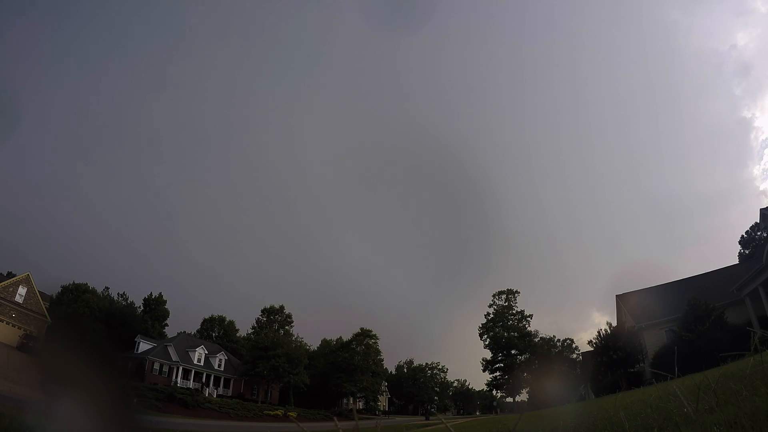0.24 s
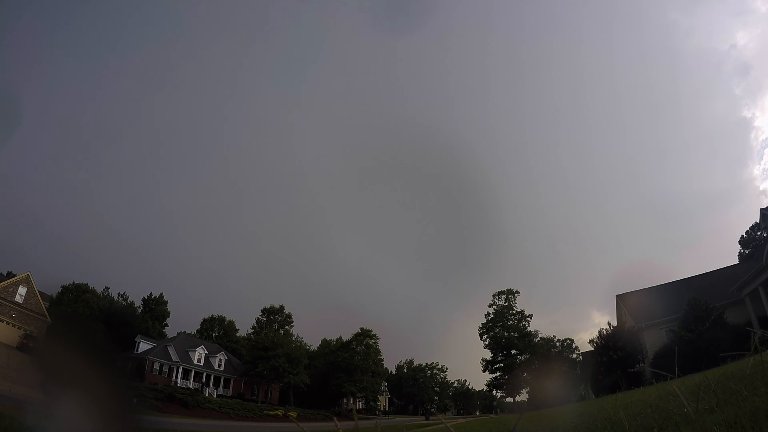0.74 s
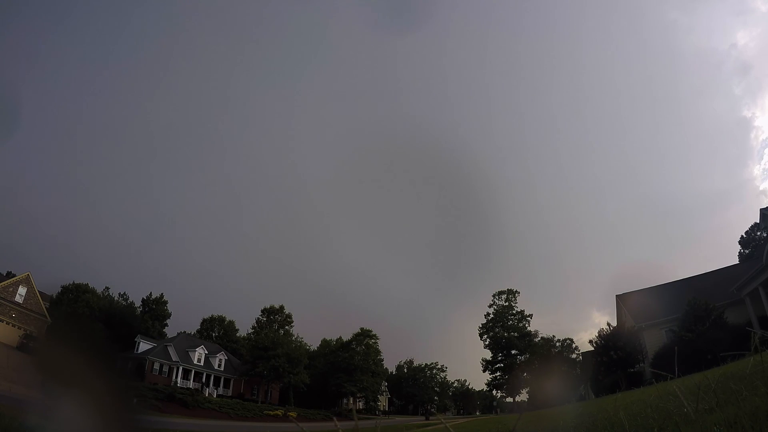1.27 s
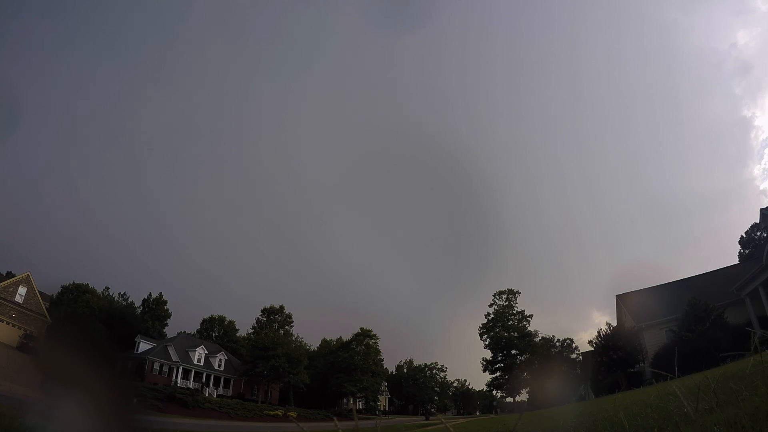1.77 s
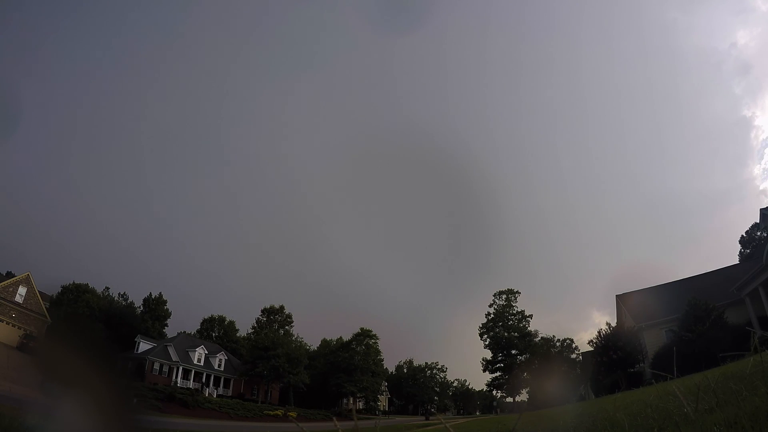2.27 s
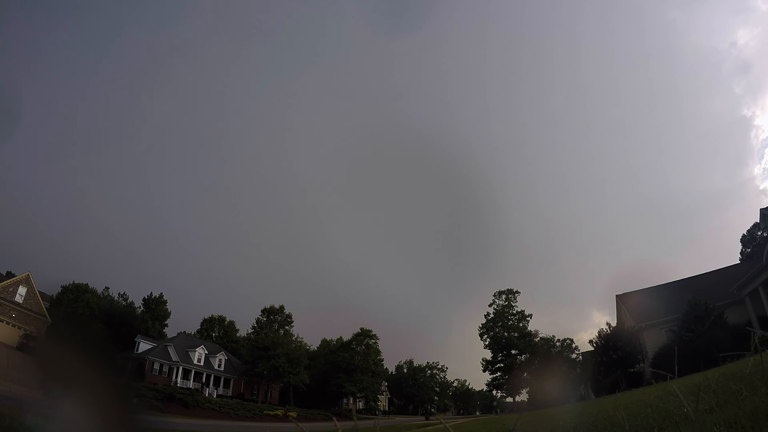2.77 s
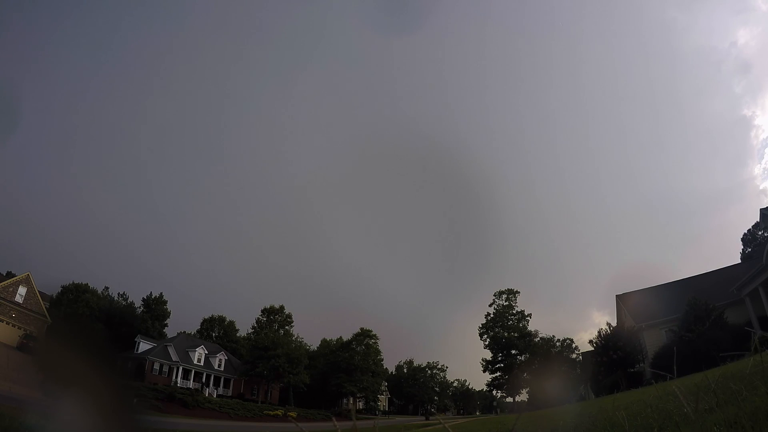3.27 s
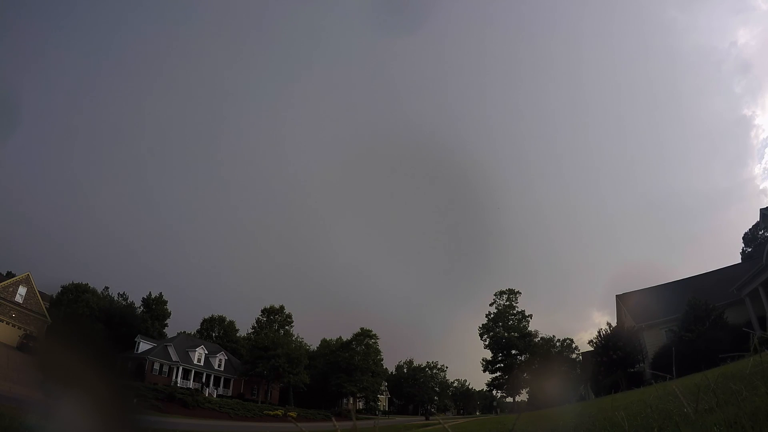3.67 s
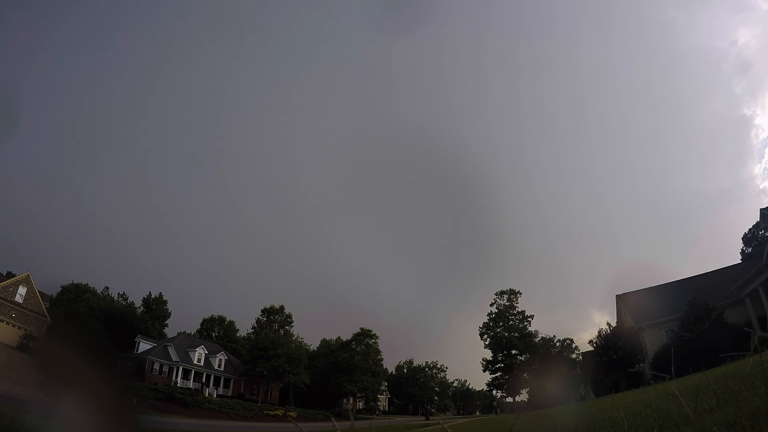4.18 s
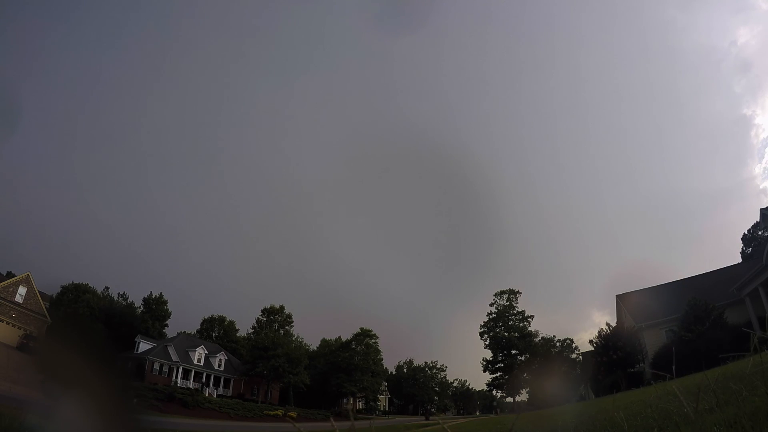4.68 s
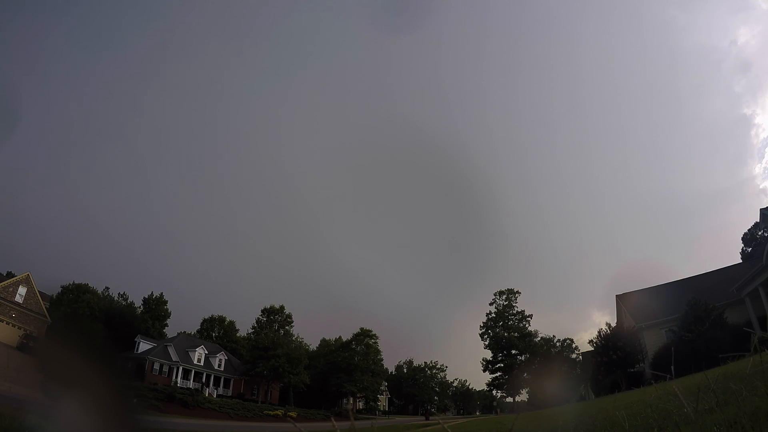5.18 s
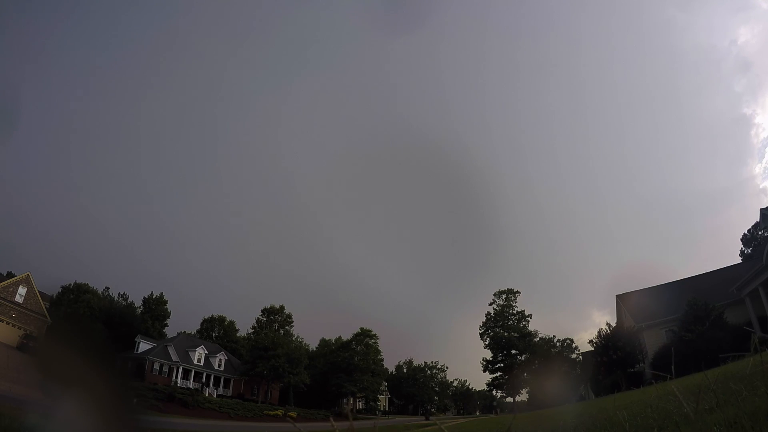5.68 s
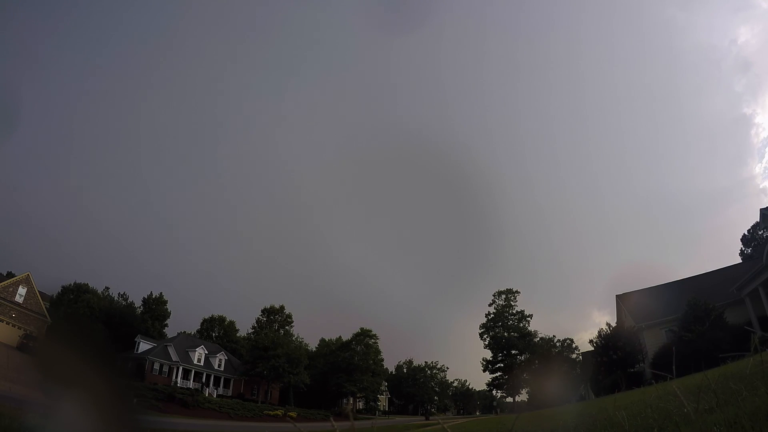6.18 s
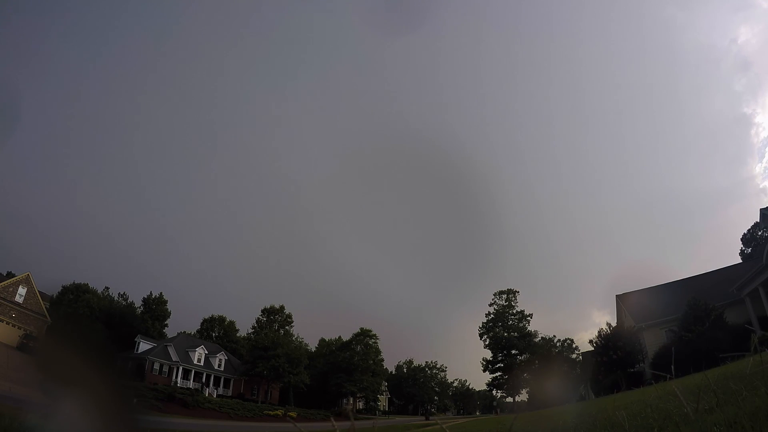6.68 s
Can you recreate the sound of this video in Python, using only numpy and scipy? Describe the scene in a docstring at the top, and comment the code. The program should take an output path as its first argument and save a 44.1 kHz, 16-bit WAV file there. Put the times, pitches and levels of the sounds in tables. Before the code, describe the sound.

Close thunder crackles and booms in dense peals over a suburban street, then rolls on duller, with raindrops ticking on the camera housing.

```python
"""Thunder over a quiet street, with soft hiss, faint whine and ticking drizzle throughout.
From 0.1 s dense peals boom and crackle over a heaving low rumble; from 2.5 s they are sparser and duller.
Strong low booms return near 5.7 and 6.0 s. Raindrops tap a camera housing, clustered at 1.3 s, hard at 6.4 s.
Shocks are rounded N-waves with noise bursts, echoed by decaying noise; roll and drizzle are random pulses;
drops are pops, shell modes and noise; hiss and whine are filtered noise."""
import sys
import numpy as np
from scipy import signal
from scipy.fft import rfft, irfft, next_fast_len
from scipy.io import wavfile
from scipy.ndimage import map_coordinates

SR = 44100
rng = np.random.default_rng(int(sys.argv[2]) if len(sys.argv) > 2 else 0)


def transcribe(u):
    """Save the signal u as a 16-bit wav file named by the first command-line argument.

    u: samples, shape (n,) or (channels, n), limited to [-1, 1]; the rate is SR.
    q: integer samples, one column per channel.
    """
    v = np.clip(np.atleast_2d(u).T, -1, 1)
    q = np.round(v * 32767).astype(np.int16)
    wavfile.write(sys.argv[1], SR, q)


N = 306054


def amp(db):
    """Decibels to gain."""
    return 10 ** (np.asarray(db) / 20)


def unit(x):
    """Scale to rms 1."""
    return x / np.sqrt(np.mean(x ** 2) + 1e-20)


def along(points, hz):
    """Interpolate (f/Hz, value) points on a log frequency axis."""
    f, v = np.transpose(points)
    return np.interp(np.log(hz + 1), np.log(f + 1), v)


def filtered(x, response):
    """Multiply the spectrum of x by response(hz)."""
    m = next_fast_len(N + SR // 2)
    hz = np.fft.rfftfreq(m, 1 / SR)
    return irfft(rfft(x, m) * response(hz), m)[:N]


def coloured(x, *spectra):
    """Filter x by the summed (f/Hz, level/dB) spectra, then scale to rms 1."""
    return unit(filtered(x, lambda hz: amp(sum(along(points, hz) for points in spectra))))


def add(track, t_s, sound):
    """Mix sound into track from t_s on."""
    where = round(t_s * SR) + np.arange(len(sound))
    inside = (where >= 0) & (where < N)
    track[where[inside]] += sound[inside]


def grains(rate_hz, spread_db):
    """Pulses of uneven size and random sign at random moments."""
    sizes = amp(spread_db * np.clip(rng.standard_normal(N), -2, 2))
    signs = rng.choice([-1, 1], N)
    return (rng.random(N) < rate_hz / SR) * sizes * signs


def wobble(rate_hz):
    """Smooth random curve: a spline through rate_hz knots a second."""
    knots = rng.standard_normal(int(N * rate_hz / SR) + 4)
    return map_coordinates(knots, [np.arange(N) * rate_hz / SR])


# background hiss spectrum, relative density: (f/Hz, level/dB)
HISS = [(600, -3), (1200, 0), (1800, 2), (2400, -3.5), (3000, 2), (3800, -2.5), (4300, -6.5), (5000, -9),
        (5400, -7), (5600, -6.5), (5950, -7.5), (6400, -12.5), (6950, -9.5), (8500, -16.5), (9800, -15.5),
        (11700, -20), (13400, -17.5), (15000, -25)]
# housing response to sound from outside: (f/Hz, level/dB)
HOUSING = [(650, 2.5), (850, -3), (1050, 2), (1250, -5.5), (1500, 2), (1820, 3.5), (2150, 1.5), (2420, 5.5),
           (2680, 6.5), (2870, -0.5), (3020, 3), (3290, 3.5), (3460, -1.5), (3660, 3), (3900, 1), (4060, 0),
           (4300, 1)]


def hiss(level_db=-60.0):
    """Steady background noise coloured by the housing."""
    return amp(level_db) * coloured(rng.standard_normal(N), HISS, HOUSING)


# camera whine bands: (f/Hz, width/Hz, level/dB)
WHINE = [(10280, 100, -84.5), (12730, 110, -93)]


def whine():
    """Faint high camera whine: Gaussian bands of noise."""
    total = np.zeros(N)
    for centre_hz, width_hz, level_db in WHINE:
        band = filtered(rng.standard_normal(N), lambda hz: np.exp(-((hz - centre_hz) / width_hz) ** 2))
        total += amp(level_db) * unit(band)
    return total


def drizzle(level_db=-79, rate_hz=16, tick_t60_s=0.0096):
    """Tiny droplets land at random moments, each a decaying noise tick."""
    t = np.arange(SR // 50) / SR
    landings = grains(rate_hz, spread_db=1.5)
    envelope = signal.fftconvolve(landings, amp(-60 * t / tick_t60_s))[:N]
    ticks = envelope * rng.standard_normal(N)
    return amp(level_db) * coloured(ticks, [(1500, -18), (3000, 2), (4300, 2), (5600, 3), (7100, -1),
                                            (9000, -6.5), (14000, -9.5), (17000, -26)])


# drops and droplets on the housing:
# (t/s, shell level/dB, pop level/dB, pop f/Hz, splash level/dB, sizzle level/dB)
DROPS = [(.215, -60, -58, 3000, -49, -54), (0.2334, -49, -50, 2600, -48, -39),
         (.788, -48, -31, 3290, -48, -54), (.918, -42, -41, 3500, -48, -59),
         (1.063, -46, -56, 3000, -47.5, -48), (1.18, -49, -39.5, 3800, -42, -45),
         (1.2728, -48, -44, 2400, -47, -39), (1.2818, -39, -35, 4750, -34, -42),
         (1.2831, -29, -20.5, 2220, -28, -24), (1.2852, -46, -32, 3650, -32, -48),
         (1.2995, -47, -38, 2100, -48, -68), (1.4405, -35.5, -33, 2170, -41.5, -36),
         (2.099, -44.5, -36.5, 2700, -52, -55), (3.457, -44, -30, 3330, -41, -48),
         (3.4607, -35, -31, 1770, -38.5, -48), (3.9197, -44.5, -37.5, 2540, -66, -70),
         (4.132, -41.5, -42.5, 2040, -55, -70), (4.4872, -52, -56, 3800, -55, -46),
         (5.137, -54, -39, 2460, -66, -70), (6.1684, -44, -58, 3000, -50, -49),
         (6.382, -33, -30, 1960, -38, -37), (6.3869, -8, -40, 1190, -35, -36)]
# housing modes when struck, relative to the shell level: (f/Hz, level/dB, t60/s)
SHELL = [(1220, -32.5, .02), (1560, -35, .014), (1850, -24.5, .014), (1980, -27, .017), (2425, -19, .026),
         (2640, -21, .02), (2985, -12, .018), (3260, -22, .014), (3680, -14.5, .012), (3900, -19, .015),
         (4780, -22.5, .009), (5350, -24, .009), (6100, -13, .008), (7080, -16, .0075), (10500, -19, .0042),
         (12100, -20, .0042), (2089, -39, .11), (2794, -38.5, .14)]
SHELL_CUT_HZ = 1100


def thinned(x):
    """A small shell radiates little bass: fourth-order high-pass."""
    return filtered(x, lambda hz: (hz ** 2 / (hz ** 2 - .75j * hz * SHELL_CUT_HZ - SHELL_CUT_HZ ** 2)) ** 2)


def rain(splash_t60_s=0.0082, sizzle_t60_s=0.004, pop_t60_s=0.0083,
         thud_db=-21, thud_hz=100, thud_t60_s=0.064,
         spot_db=1.0, spatter_db=-23, spatter_t60_s=0.072):
    """Each drop pops, nudges and rings the housing by its spot, and bursts in splash, sizzle and spatter."""
    taps, thuds, splashes, sizzles, spatters = np.zeros((5, N))
    t = np.arange(SR // 10) / SR
    modes = np.array([amp(db - 60 * t / t60) * np.sin(2 * np.pi * hz * t) for hz, db, t60 in SHELL])
    spots = amp(spot_db * rng.standard_normal((len(DROPS), len(SHELL))))
    for (t_s, shell_db, pop_db, pop_hz, splash_db, sizzle_db), spot in zip(DROPS, spots):
        onset = (1 - np.exp(-pop_hz * t)) ** 2
        pop = amp(pop_db - 60 * t / pop_t60_s) * np.sin(2 * np.pi * pop_hz * t) * onset
        ring = amp(shell_db) * (spot @ modes)
        thud = amp(shell_db + thud_db - 60 * t / thud_t60_s) * np.sin(2 * np.pi * thud_hz * t)
        add(taps, t_s, pop + ring)
        add(thuds, t_s, thud)
        add(splashes, t_s, amp(splash_db - 60 * t / splash_t60_s))
        add(sizzles, t_s, amp(sizzle_db - 60 * t / sizzle_t60_s))
        add(spatters, t_s, amp(splash_db + spatter_db - 60 * t / spatter_t60_s))
    spray = coloured(rng.standard_normal(N), [(900, -42), (2000, 3), (3600, 9), (4500, -2.5),
                                              (5600, 6), (8000, -8), (11000, -19)])
    sizzle = coloured(rng.standard_normal(N), [(4000, -28), (8000, -2), (10500, 4.5), (12000, -4),
                                               (13500, 4.5), (14800, 9), (16500, -25)])
    specks = grains(rate_hz=2700, spread_db=6)
    spatter = coloured(specks, [(1000, -33), (2000, -9), (4000, 5.0), (5500, -16), (12000, -20)])
    return thinned(taps) + thuds + splashes * spray + sizzles * sizzle + spatters * spatter


def farther(x, dull_hz=1400, fade_s=2.0):
    """Later sound has come a longer way through air, which takes its treble."""
    dull = filtered(x, lambda hz: 1 / (1 + (hz / dull_hz) ** 4))
    return dull + (x - dull) * np.exp(-np.arange(N) / SR / fade_s)


# roll of countless weak shocks: (t/s, rumble level/dB, crackle level/dB)
ROLL = [(0, -35, -47), (.2, -45.5, -47), (.3, -42, -50.5), (.5, -43, -48), (.64, -46, -49),
        (.8, -43.5, -50.5), (1, -41.5, -49.5), (1.16, -45.5, -48.5), (1.42, -47, -48), (1.52, -43.5, -50.5),
        (1.8, -51.5, -57), (1.98, -44, -55), (2.46, -46.5, -53), (2.78, -43.5, -60.5), (3.3, -45, -57),
        (3.55, -46, -65.5), (3.7, -49, -52), (3.9, -49.5, -67.5), (4.24, -48.5, -67), (4.5, -47, -55),
        (4.7, -41.5, -67), (4.9, -46, -59.5), (5.45, -47, -62), (5.6, -44.5, -58), (5.85, -51.5, -57.5),
        (6.15, -49.5, -60), (6.35, -40.5, -64), (6.5, -49.5, -62), (6.94, -47.5, -65)]
# rumble spectrum, relative density: (f/Hz, level/dB)
RUMBLE = [(20, -3), (40, 4), (60, 6), (90, 0.5), (130, 1), (200, -5), (300, -9.5), (450, -23), (800, -24.5),
          (2000, -50)]
# crackle spectrum of roll and claps, relative density: (f/Hz, level/dB)
CRACKLE = [(120, -45), (280, 7.5), (400, 4.5), (550, -2), (750, -6.5), (1100, -5.5), (1900, -9.5),
           (2800, -15.5), (4000, -26.5), (8000, -66)]
SWELLS_PER_S = 18  # knots of the level curves


def roll(heave_db=1.65, flutter_db=1.0):
    """Weak shocks from far parts of the channel merge into heaving rumble and grainy crackle."""
    t_s, rumble_db, crackle_db = np.transpose(ROLL)
    now = np.arange(N) / SR
    rumble = coloured(grains(rate_hz=600, spread_db=0.0), RUMBLE)
    crackle = farther(coloured(grains(rate_hz=420, spread_db=1.0), CRACKLE, HOUSING))
    swell_db = heave_db * wobble(SWELLS_PER_S)
    flutter = flutter_db * wobble(SWELLS_PER_S)
    rumble_gain = amp(np.interp(now, t_s, rumble_db) + swell_db)
    crackle_gain = amp(np.interp(now, t_s, crackle_db) + swell_db + flutter)
    return rumble * rumble_gain + crackle * crackle_gain


def shock(hz):
    """N-wave rounded by the air: push, pull, push, centred in 0.1 s."""
    u = (np.pi * hz * (np.arange(SR // 10) - SR // 20) / SR) ** 2
    return (2 * u - 1) * np.exp(-u)


# peals, one shock or a quick run each; length sets how fast the run falls away:
# (t/s, boom level/dB, boom f/Hz, body level/dB, crackle level/dB, length/s)
PEALS = [(0.11, -25, 189, -37, -50, 0.0088), (.194, -30, 170, -35.5, -44, 0.014),
         (0.236, -37, 151.5, -29.5, -41, 0.0062), (0.25, -23.5, 145, -39, -36.5, 0.013),
         (0.323, -38, 230, -40, -56, 0.015), (0.4, -23.5, 136, -29, -39.5, 0.013),
         (0.437, -18.5, 122, -39, -47, 0.014), (0.468, -27, 210, -31, -43, 0.013),
         (0.498, -26, 156, -32.5, -43, 0.014), (0.523, -33, 161, -38.5, -45, 0.024),
         (0.565, -25.5, 150, -39, -44.5, 0.0081), (0.632, -41, 220, -42.5, -58, 0.059),
         (0.705, -24, 124, -31, -39.5, 0.021), (0.739, -20.5, 117, -42, -48, 0.012),
         (0.753, -20, 149, -45, -43, 0.0063), (0.762, -34, 148, -30.5, -39, 0.011),
         (.791, -26, 135, -36, -46, 0.016), (0.875, -26, 191, -36, -53, 0.023),
         (0.929, -20, 137, -38, -49, 0.0085), (1.038, -29, 109, -37, -47.5, 0.0072),
         (1.053, -21.5, 136, -36, -44.5, 0.013), (1.078, -27, 134, -39.5, -48, 0.014),
         (1.096, -24, 135, -49, -50, 0.022), (1.114, -25.5, 143, -52, -52, 0.011),
         (1.196, -29.5, 114, -36, -47, 0.0075), (1.215, -31, 176, -33.5, -48, 0.011),
         (1.244, -30.5, 140, -39.5, -47.5, 0.022), (1.311, -26, 220, -33, -57, 0.0086),
         (1.349, -22, 209, -32, -46, 0.011), (1.396, -31, 142, -42, -51, 0.02),
         (1.663, -33.5, 204, -47, -51, 0.01), (1.919, -30.5, 116, -48.5, -55, 0.031),
         (2.199, -33, 212, -36.5, -51, 0.033), (2.352, -43, 118.4, -39.5, -48, 0.017),
         (2.38, -33, 180, -45, -62, 0.015), (2.518, -27.5, 84, -45, -58, 0.012),
         (2.589, -19, 80, -36, -45, 0.017), (2.61, -34, 111, -56, -50, 0.0087),
         (2.687, -28, 135, -42, -55, 0.015), (2.82, -34.5, 99, -52, -64, 0.022),
         (2.901, -27, 90.5, -42, -52, 0.016), (2.926, -34, 66, -48, -55, 0.012),
         (3.014, -31, 73.6, -45, -53, 0.019), (3.125, -31, 103, -59, -65, 0.038),
         (3.236, -26, 97, -51, -56, 0.016), (3.331, -37, 108, -52, -65, 0.011),
         (3.383, -45, 224, -46, -55, 0.0081), (3.719, -41, 219, -48, -64, 0.016),
         (3.864, -37, 198, -60, -73, 0.013), (4.01, -41.5, 201, -45.5, -61, 0.016),
         (4.12, -36.5, 201, -41, -65, 0.016), (4.149, -30.5, 150, -38, -52, 0.0099),
         (4.172, -37, 172, -44, -55, 0.008), (4.189, -28, 126, -37, -56, 0.0056),
         (4.291, -25.5, 120, -45, -62, 0.012), (4.318, -26, 120, -44.5, -68, .008),
         (4.328, -29, 102, -39, -63, 0.0084), (4.46, -33.5, 162, -47, -57, 0.014),
         (4.494, -48, 231, -41, -52, 0.0072), (4.54, -49, 239, -45.5, -57, 0.028),
         (4.581, -38, 236, -34, -56, 0.0067), (4.649, -24, 119, -38.5, -62, 0.015),
         (4.702, -28, 71, -46, -66, 0.0099), (4.716, -26.5, 148, -44, -68, 0.012),
         (4.782, -29, 107, -43, -64, 0.029), (4.801, -21.5, 103, -53, -56, 0.014),
         (4.83, -29.5, 114, -43.5, -61, 0.031), (4.891, -37, 253, -40, -63, 0.0074),
         (4.965, -29.5, 59, -45, -55, 0.0098), (5.008, -31, 62, -41.5, -65, .008),
         (5.028, -29.5, 134.5, -41.5, -58, 0.0066), (5.104, -28.5, 74, -47, -70, .018),
         (5.14, -30.5, 136, -42, -48, 0.0066), (5.248, -30.5, 108, -44, -65, 0.021),
         (5.594, -37, 147, -40.5, -72, .035), (5.69, -14.5, 70.4, -29, -45, 0.0068),
         (5.705, -16, 90, -32, -44.5, 0.0058), (5.72, -27, 121, -44, -54, 0.021),
         (5.924, -36, 130, -47, -66, 0.015), (5.998, -17.5, 89, -34.5, -51, 0.0078),
         (6.015, -21, 71.7, -37.5, -44, 0.0063), (6.03, -29, 99, -41, -53, .012),
         (6.613, -35, 116, -53, -63, 0.026), (6.693, -30.5, 129, -46, -57, 0.025),
         (6.868, -32.5, 101, -48.5, -73, 0.02)]
SHOCK_GAP_S, GAP_SCATTER_S = 0.01377, 0.0027
SHOCK_SCATTER_DB, SHOCK_SCATTER_OCTAVES = 1, 0.34
PEAL_FALL_DB = 8  # mean loss one peal length after its start


def shocks(count=6):
    """A sharp shock opens each peal; it repeats at a nearly even pace, the repeats hold, then fall away."""
    k = np.arange(count)
    chance = rng.standard_normal((len(PEALS), 3, count)) * (k > 0)  # first shock has no scatter
    for (t_s, boom_db, hz, body_db, crackle_db, length_s), (late, louder, higher) in zip(PEALS, chance):
        delay_s = k * SHOCK_GAP_S + np.cumsum(late) * GAP_SCATTER_S
        fall_db = PEAL_FALL_DB * (k * SHOCK_GAP_S / length_s) ** 2
        loss_db = fall_db - SHOCK_SCATTER_DB * louder
        shock_hz = hz * 2 ** (SHOCK_SCATTER_OCTAVES * higher)
        rows = np.transpose([t_s + delay_s, boom_db - loss_db, shock_hz,
                             body_db - loss_db, crackle_db - loss_db])
        yield from rows[loss_db < 40]


# shock fronts are brighter than the roll: (f/Hz, level/dB)
FRONT = [(300, -19.5), (1000, -3.5), (2500, -2)]


def claps(crackle_t60_s=0.056, lead_cycles=0.622, attack_s=0.0013, body_t60_s=0.075,
          snap_db=33, trail_db=-0.7):
    """Strong shocks boom; steep fronts snap and trail crackle; kinks in the channel add a tearing body."""
    booms, snaps, fronts, bodies = np.zeros((4, N))
    t = np.arange(SR // 10) / SR
    rise = 1 - np.exp(-t / attack_s)
    for t_s, boom_db, hz, body_db, crackle_db in shocks():
        add(booms, t_s - t[-1] / 2, amp(boom_db) * shock(hz))
        front_s = t_s - lead_cycles / hz  # the front leads the trough
        add(fronts, front_s, amp(crackle_db - 60 * t / crackle_t60_s) * rise)
        add(snaps, front_s, np.atleast_1d(amp(crackle_db + snap_db)))
        add(bodies, front_s, amp(body_db - 60 * t / body_t60_s) * rise)
    crackle = coloured(grains(rate_hz=1100, spread_db=2.0), CRACKLE, HOUSING, FRONT)
    snaps = filtered(snaps, lambda hz: amp(along(CRACKLE, hz) + along(HOUSING, hz) + along(FRONT, hz)))
    tearing = coloured(grains(rate_hz=3900, spread_db=1.5),
                       [(120, -5.5), (220, 6), (350, 2), (500, -5), (700, -11.5),
                        (850, -17), (1050, -13.5), (1300, -38), (3000, -64)])
    return booms + snaps + amp(trail_db) * fronts * crackle + bodies * tearing


# echo decay between the houses: (f/Hz, t60/s)
STREET = [(60, 1), (400, 0.22), (2000, 1), (10000, 0.13)]


def street(x):
    """Houses and trees scatter the thunder: a noise tail 10 ms late, dying fastest at the top."""
    hz, t, z = signal.stft(rng.standard_normal(SR // 2), SR, nperseg=256)
    decay = amp(-60 * t / along(STREET, hz)[:, None])
    tail = signal.istft(z * decay, SR, nperseg=256)[1]
    delayed = np.pad(x, (SR // 100, 0))
    return signal.fftconvolve(delayed, tail / np.linalg.norm(tail))[:N]


def scene(echo_db=-16.5):
    """Hiss, whine, drizzle, raindrops, roll, and thunder with its echo, in one channel."""
    background = hiss() + whine() + drizzle()
    thunder = claps()
    return (background + rain() + roll() + thunder + amp(echo_db) * street(thunder))[None]


TOP_HZ, BASS_CUT_HZ = 15350, 14


def record(dry):
    """The camera loses the deepest bass and cuts steeply above its band limit."""
    def response(hz):
        high_pass = hz ** 2 / (hz ** 2 + BASS_CUT_HZ ** 2)
        low_pass = 1 / (1 + (hz / TOP_HZ) ** 120)
        return high_pass * low_pass
    return filtered(dry[0], response)[None]


dry = scene()
out = record(dry)
transcribe(out)
```